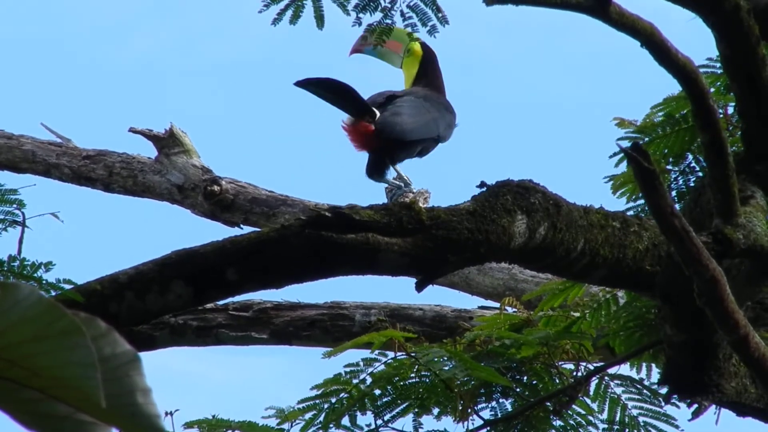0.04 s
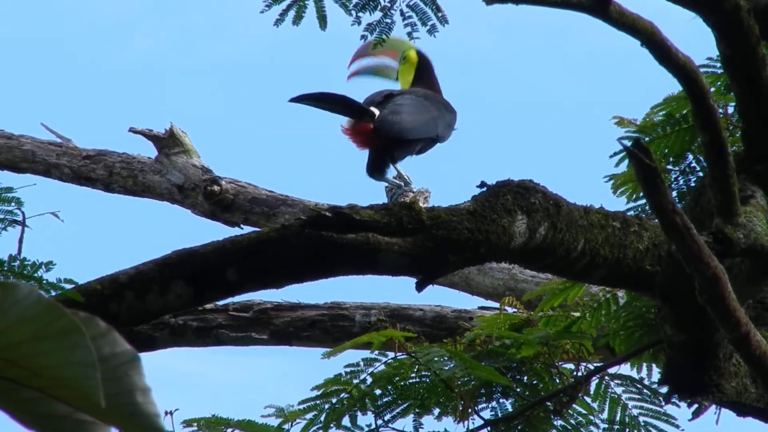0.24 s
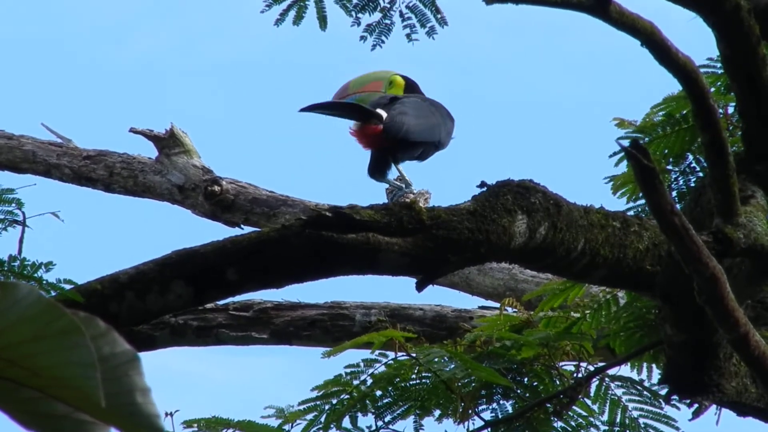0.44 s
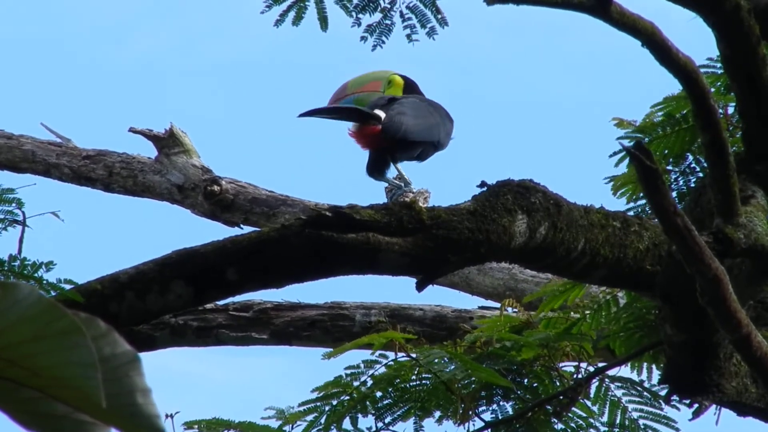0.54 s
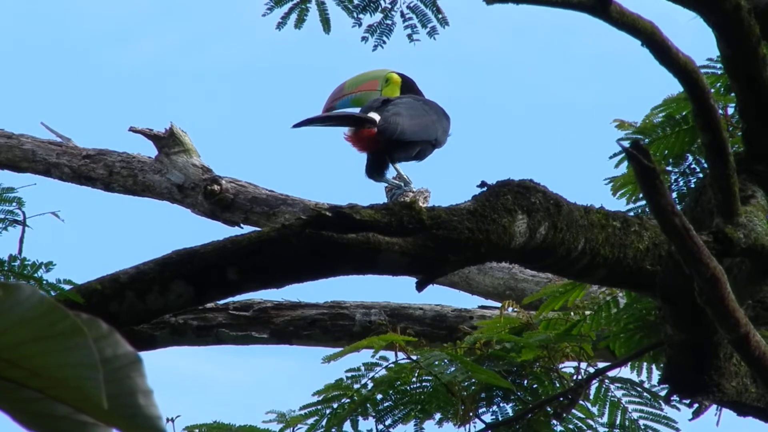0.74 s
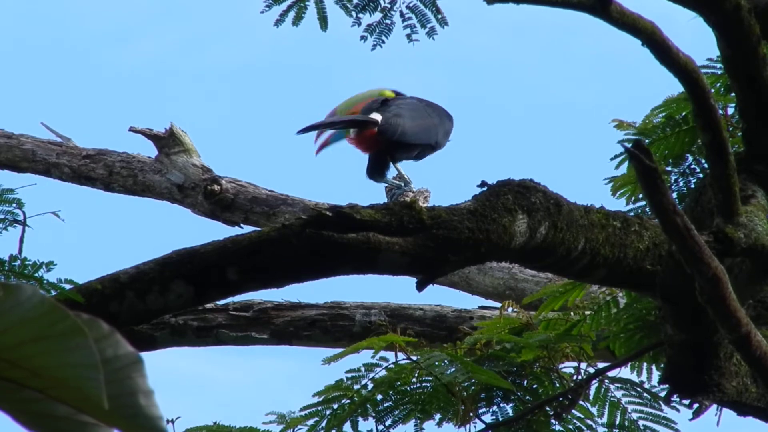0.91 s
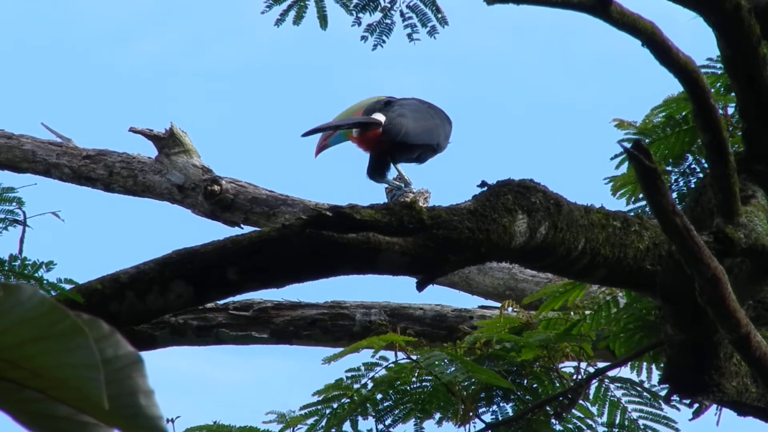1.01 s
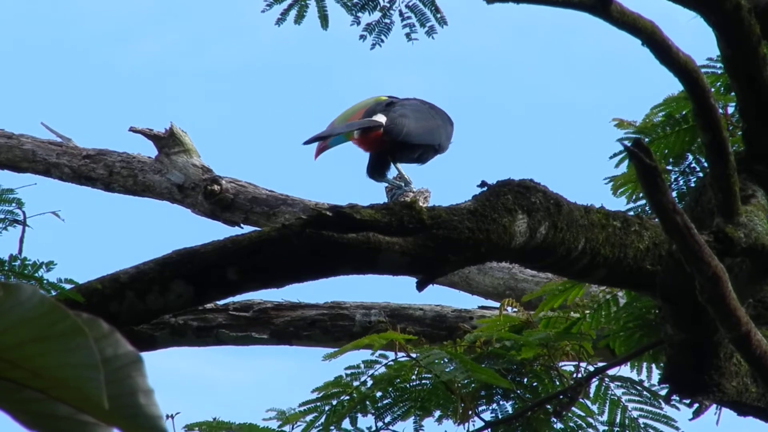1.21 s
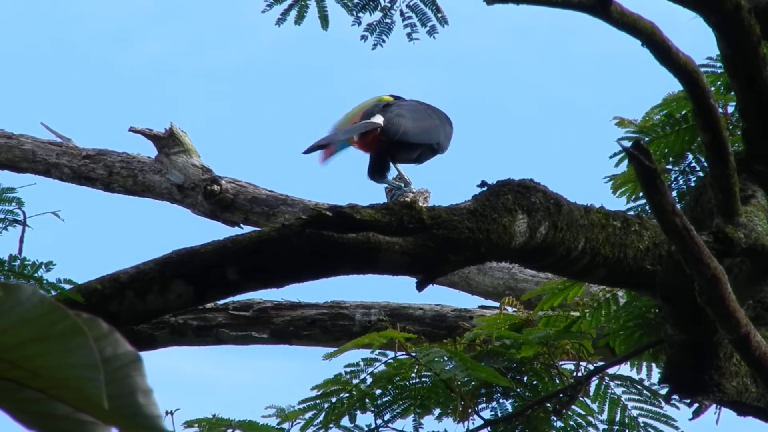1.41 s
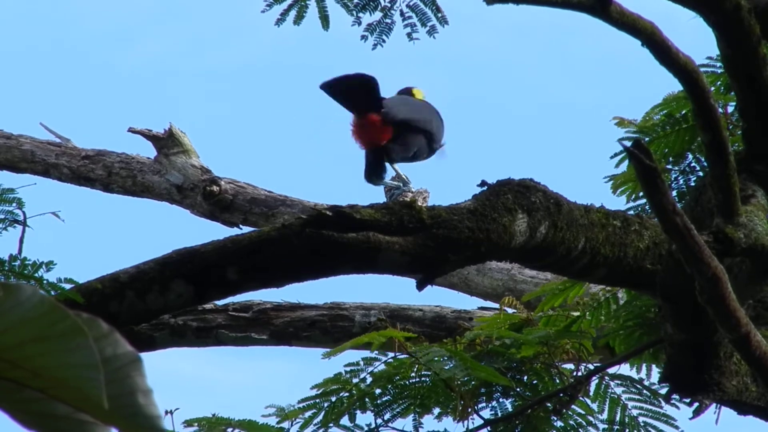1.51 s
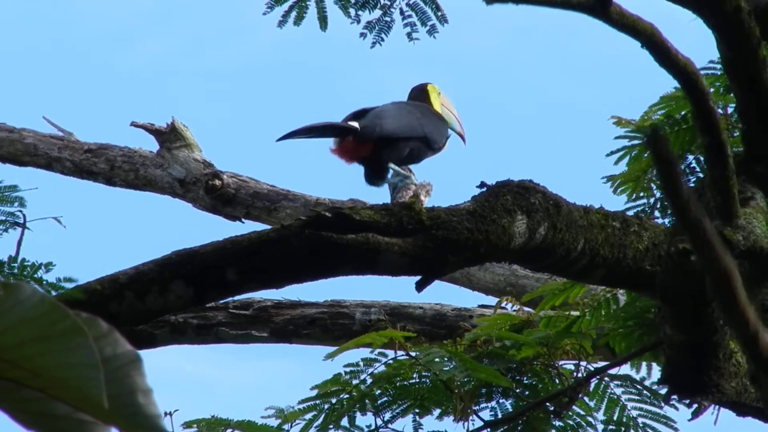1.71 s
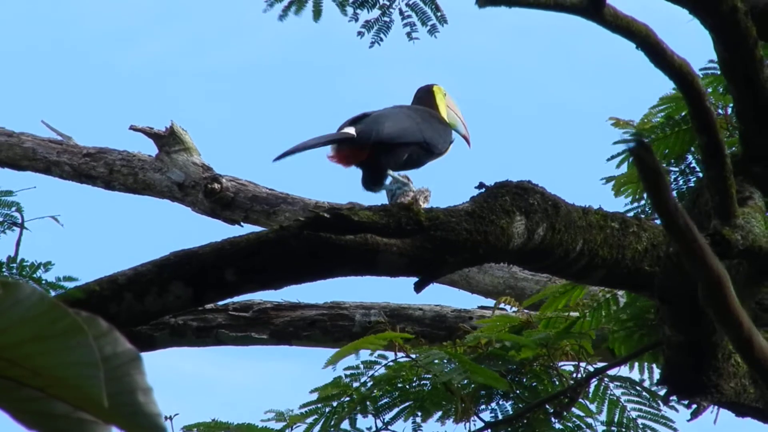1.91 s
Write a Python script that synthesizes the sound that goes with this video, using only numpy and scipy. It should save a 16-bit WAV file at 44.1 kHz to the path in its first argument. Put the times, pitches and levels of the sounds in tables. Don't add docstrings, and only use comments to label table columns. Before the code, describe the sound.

A toucan yelps loudly once, then twice more briefly and softly, with a second answering in three rattling croaks; small high chirps repeat over insects, leaves and light wind, heard outdoors in stereo from some distance.

```python
import sys
import numpy as np
from scipy import signal
from scipy.fft import rfft, irfft, next_fast_len
from scipy.io import wavfile
from scipy.ndimage import uniform_filter1d

SR = 44100
rng = np.random.default_rng(int(sys.argv[2]) if len(sys.argv) > 2 else 0)


def store_pcm(level_fs):
    pcm = np.round(np.clip(level_fs, -1, 1) * 32767).astype(np.int16)
    wavfile.write(sys.argv[1], SR, np.atleast_2d(pcm).T)


def voltage_ratio(decibels):
    exponent = np.asarray(decibels, float) / 20
    return 10 ** exponent


N = 85995

# (frequency [Hz], density [dB])
AIR_SPECTRUM = [(600, -6.5), (1000, 3), (2500, 1.5), (4000, 2), (7600, -11), (8700, -1.5), (11200, -11),
                (15900, -17)]
# (centre [Hz], width [Hz], level [dB])
INSECT_BANDS = [(9890, 820, -61), (6260, 2050, -57)]
# (frequency [Hz], density [dB])
WIND_SPECTRUM = [(20, -37), (45, -68), (75, 6), (110, 5), (200, 0), (300, -12), (600, -24)]
# (time [s], level [dB])
GUST_LEVEL = [(0.0, -68), (0.238, -66), (0.308, -55), (0.396, -60), (0.438, -55), (0.558, -66),
              (0.928, -66), (0.95, -61), (1.058, -58), (1.112, -67), (1.412, -63), (1.466, -70),
              (1.558, -60), (1.95, -67)]
# (time [s], level [dB])
DRONE_LEVEL = [(0.0, -59), (0.216, -55.5), (0.222, -57), (1.09, -58.5), (1.276, -52), (1.834, -53.5),
               (1.95, -58.5)]
# (frequency [Hz], density [dB])
DRONE_SPECTRUM = [(250, -6), (330, -3.5), (405, 6.5), (480, 1), (700, -3.5), (1000, -11.5)]
# (frequency [Hz], correlation [-1..1])
PORT_CORRELATION = [(60, .52), (300, .15), (700, .05), (2000, .5), (5000, .35), (9000, -.15), (14000, -.1)]
# (frequency [Hz], left minus right [dB])
PORT_BALANCE = [(60, 1.5), (500, -0.9), (2000, 2.5), (5000, 2), (10000, -3.5), (14000, 0)]
# (start [s], length [s], from [Hz], to [Hz], level [dB])
FAR_WHISTLES = [(0, .16, 2750, 2760, -51), (0, .12, 1695, 1680, -58), (0, .11, 1500, 1550, -58),
                (0, .13, 2160, 2110, -60), (1.435, .07, 1920, 1900, -57), (1.53, .07, 1850, 2000, -54),
                (1.655, .04, 3200, 3150, -52), (.295, .04, 1230, 1280, -46), (1.778, .06, 3200, 3390, -54),
                (1.84, .10, 3400, 3380, -53), (1.775, .08, 3770, 3770, -58), (.42, .09, 4580, 4500, -54),
                (1.71, .035, 2370, 2370, -58), (1.26, .1, 1800, 1780, -63)]
# (start [s], level [dB], end of high note [Hz], middle notes [Hz], low note [Hz])
CHIRP_PHRASES = [(.565, -61, 7300, 6900, 5600), (.724, -57, 7250, 6950, 5600),
                 (.878, -54, 7250, 7050, 5700), (1.030, -53, 7150, 7250, 5800),
                 (1.183, -52, 7200, 7400, 6300), (1.330, -52, 7250, 7300, 6600),
                 (1.483, -52, 7350, 7700, 6500), (1.636, -50, 7650, 8100, 6650),
                 (1.790, -50, 7800, 8000, 6650), (1.940, -51, 7800, 8000, 6650)]
# (delay [s], length [s], level [dB])
CHIRP_NOTES = [
    (0, .017, 4),
    (.052, .012, 2),
    (.070, .022, 3),
    (.088, .016, -1),
    (.123, .020, 1),
]
NOTE_SWELL_DB = [8, -6, -8, -6, 0]
# (delay [s], level [dB])
CHIRP_TRUNKS = [(.026, -7), (.047, -11)]
# (start [s], rattle [s], hold [s], level [dB])
CROAK_CALLS = [
    (.303, .122, .066, -38.5),
    (.904, .122, 0.056, -37),
    (1.507, .120, 0.069, -34),
]
LOW_VOICE_HZ = [1300, 1430, 1478]
HIGH_VOICE_HZ = [1500, 1575, 1583]
# (start [dB], late rattle [dB], hold [dB])
LOW_VOICE_DB = [
    [-2, -4, -4],
    [6, -5, -5],
    [3, -14, -15],
]
# (time [s], first partial [dB], second partial [dB])
YELP_LEVELS = [
    [(.216, -55, -52), (.223, -35, -33), (.235, -30, -29), (.250, -25, -26), (.268, -25, -29),
     (.290, -34, -35), (.310, -36, -36), (.346, -28, -35), (.368, -56, -48)],
    [(.506, -52, -52), (.512, -41, -36), (.526, -36, -33), (.531, -32, -28), (.535, -39, -34),
     (.545, -64, -52)],
    [(.819, -52, -50), (.825, -42, -37), (.835, -43, -34), (.849, -35.5, -37), (.860, -60, -50)],
]
# (time [s], pitch [Hz])
YELP_PITCH = [(.216, 1660), (.232, 1695), (.247, 1682), (.267, 1588), (.285, 1530), (.323, 1485),
              (.353, 1425), (.367, 1170), (.506, 1490), (.531, 1465), (.544, 1130), (.818, 1530),
              (.836, 1520), (.846, 1475), (.860, 1150)]
# (delay [s], level [dB])
YELP_TRUNKS = [(.028, -14), (.079, -17)]


def evened(x):
    return x / np.sqrt(np.mean(x ** 2) + 1e-20)


def read(points, hz):
    f, value = np.transpose(points)
    return np.interp(np.log(hz + 1), np.log(f + 1), value)


def add(mix, start_s, sound):
    part = mix[round(start_s * SR):][:len(sound)]
    part += sound[:len(part)]


def flutter(count, span_s):
    size = max(int(span_s * SR), 1)
    smooth = uniform_filter1d(rng.standard_normal(count), size)
    return evened(uniform_filter1d(smooth, size))


def phase(hz):
    return 2 * np.pi * np.cumsum(hz) / SR


def edges(t, length_s, edge_s):
    return np.sin(np.pi / 2 * np.clip(np.minimum(t, length_s - t) / edge_s, 0, 1)) ** 2


def closing(left_s, edge_s):
    return edges(left_s, 9, edge_s)


def hiss(shape, patchy_db, swell_db):
    frames, hz = N // 256 + 5, np.fft.rfftfreq(1024, 1 / SR)
    a, b, c, d, patches = rng.standard_normal((frames, 513, 5)).T
    patches = uniform_filter1d(patches, size=10, axis=0)
    patches = evened(uniform_filter1d(patches, size=10, axis=1))
    swell = evened(uniform_filter1d(rng.standard_normal(frames), size=8))
    same = np.clip(read(PORT_CORRELATION, hz), -1, 1)[:, None]
    lean_db = read(PORT_BALANCE, hz)[:, None] / 2
    left = a + 1j * b
    right = same * left + np.sqrt(1 - same ** 2) * (c + 1j * d)
    z = np.array([left * voltage_ratio(lean_db), right * voltage_ratio(-lean_db)])
    z = z * voltage_ratio(shape(hz)[:, None] + patchy_db * patches + swell_db * swell)
    return evened(signal.istft(z, nperseg=1024, noverlap=768)[1][:, :N])


def echoed(x, echoes):
    out = x.copy()
    for delay_s, db in echoes:
        add(out, delay_s, voltage_ratio(db) * x[:N - round(delay_s * SR)])
    return out


def placed(x, pan_db, wet_db, t60_s, gap_s, same, even_hz=0):
    at = np.arange(0, SR - 20, 20) + rng.integers(0, 20, (2, (SR - 1) // 20))
    taps = np.zeros((2, SR))
    np.put_along_axis(taps, at, rng.choice([-1., 1.], at.shape), 1)
    t = np.arange(SR) / SR
    early = 1 + 4.3 * np.exp(-t / 0.012)
    taps = taps * voltage_ratio(-60 * t / t60_s) * np.clip((t - gap_s) / 0.0012, 0, 1) * early
    taps = np.array([taps[0], same * taps[0] + np.sqrt(1 - min(same, 1) ** 2) * taps[1]])
    wet = signal.fftconvolve(x[None], taps / np.linalg.norm(taps[0]), axes=1)[:, :N]
    if even_hz:
        wet = np.diff(wet, prepend=0) / (2 * np.sin(np.pi * even_hz / SR))
    sway, sway_s = .4, .003
    wet = wet * (1 - sway / 2 + sway * flutter(N, sway_s))
    return (np.array([x, x]) + voltage_ratio(wet_db) * wet) * voltage_ratio(np.array([[pan_db], [-pan_db]]) / 2)


def drone():
    level_db = np.interp(np.arange(N) / SR, *np.transpose(DRONE_LEVEL))
    spectrum = [(150, -44)] + DRONE_SPECTRUM + [(2000, -101)]
    return voltage_ratio(level_db) * hiss(lambda hz: read(spectrum, hz), 0.93, 0.17)


def wind():
    level_db = 2.5 + np.interp(np.arange(N) / SR, *np.transpose(GUST_LEVEL))
    spectrum = WIND_SPECTRUM + [(1200, -62)]
    return voltage_ratio(level_db) * hiss(lambda hz: read(spectrum, hz), 0.93, 0.28)


def leaves():
    spectrum = [(300, -57)] + AIR_SPECTRUM
    return voltage_ratio(-53) * hiss(lambda hz: read(spectrum, hz), patchy_db=1.6, swell_db=0.11)


def insects():
    out = np.zeros((2, N))
    for centre_hz, width_hz, db in INSECT_BANDS:
        band = hiss(lambda hz: np.maximum(-12 * ((hz - centre_hz) / width_hz) ** 2, -80), 1.6, 1.0)
        out = out + voltage_ratio(db) * band
    return out


def far_birds():
    out = np.zeros(N)
    fade_db, edge_s = -7, .006
    for start_s, length_s, hz, end_hz, db in FAR_WHISTLES:
        t = np.arange(0, length_s, 1 / SR)
        a = phase(hz + (end_hz - hz) * t / length_s + 8 * flutter(len(t), 0.027))
        level = voltage_ratio(db + fade_db * t / length_s) * (1 + 0.38 * flutter(len(t), 0.0027))
        add(out, start_s, level * edges(t, length_s, edge_s) * np.cos(a))
    return out


def chirps():
    out = np.zeros(N)
    top_hz, middle_end_hz, low_end_hz, rough = 8400, 6100, 5200, .15
    for start_s, db, top_end_hz, middle_hz, low_hz in CHIRP_PHRASES:
        sweeps = [(top_hz, top_end_hz)] + [(middle_hz, middle_end_hz)] * 3 + [(low_hz, low_end_hz)]
        for (delay_s, length_s, note_db), (hz, end_hz), swell_db in zip(CHIRP_NOTES, sweeps, NOTE_SWELL_DB):
            t = np.arange(0, length_s, 1 / SR)
            a = phase(hz + (end_hz - hz) * (t / length_s) ** 0.803)
            swell = swell_db * (t / length_s - (swell_db > 0))
            level = voltage_ratio(db + note_db + swell) * (1 + rough * flutter(len(t), 0.0011))
            add(out, start_s + delay_s, level * edges(t, length_s, 0.00037) * np.cos(a))
    return out


def croaks():
    out = np.zeros(N)
    beat_s, beat_open, leak, hold_rise_s, close_s = .0207, .78, .18, .009, .016
    burst_rise_hz, burst_spread_db, swell_db = 90, 1.0, -13
    side_hz, side_db, octave_db = 400, -20, -22
    rattle_rough, hold_rough = .2, .07
    for (start_s, rattle_s, hold_s, db), low_db in zip(CROAK_CALLS, LOW_VOICE_DB):
        length_s = rattle_s + hold_s
        t = np.arange(0, length_s, 1 / SR)
        rattling = t < rattle_s
        knots_s = [0, rattle_s * .9, rattle_s * 1.055]
        beat = np.minimum(((t - rattle_s) % beat_s) / (beat_s * beat_open), 1)
        rise_hz = burst_rise_hz * (beat - .5) * rattling
        low, high = (phase(np.interp(t, knots_s, hz) + rise_hz + 10 * flutter(len(t), 0.0032))
                     for hz in (LOW_VOICE_HZ, HIGH_VOICE_HZ))
        tone = np.cos(high) + voltage_ratio(np.interp(t, knots_s, low_db)) * np.cos(low)
        side_level = voltage_ratio(side_db + np.interp(t, knots_s, [0, 0, -10]))
        tone = tone + side_level * np.cos(high + 2 * np.pi * side_hz * t)
        tone = tone + voltage_ratio(octave_db) * np.cos(2 * high) * (0.72 + 0.34 * flutter(len(t), 0.0038))
        held = np.minimum((t - rattle_s) / hold_rise_s, 1)
        gate = leak + np.where(rattling, np.sin(np.pi * beat), held)
        spread_db = burst_spread_db * flutter(len(t), 0.0094) * rattling
        swell = voltage_ratio(db + swell_db * np.clip(1 - t / rattle_s, 0, 1) + spread_db)
        rough = np.interp(t, knots_s, [rattle_rough, rattle_rough, hold_rough])
        grain = 1 + rough * flutter(len(t), 0.0016)
        envelope = edges(t, length_s, 0.012) * closing(length_s - t, close_s)
        add(out, start_s, np.sqrt(2) * tone * gate * swell * envelope * grain)
    return out


def yelps():
    out = np.zeros(N)
    third_db, fourth_db, half_db, strain_db = -13.5, -34, -28, -27
    bill_hz, bill_width_hz, bill_rough = 4150, 250, .4
    edge_s, close_s, rough = 0.0014, .005, 0.011
    break_db, break_lead_s, break_grain_s = -30, .009, .0008
    for rows in YELP_LEVELS:
        s, first_db, second_db = np.transpose(rows)
        t = np.arange(s[0], s[-1], 1 / SR)
        hz = np.interp(t, *np.transpose(YELP_PITCH))
        a = phase(hz)
        bill = voltage_ratio(third_db) / (1 + ((3 * hz - bill_hz) / bill_width_hz) ** 2)
        bill = bill * (1 + bill_rough * flutter(len(t), 0.0013))
        upper = np.cos(2 * a) + bill * np.cos(3 * a) + voltage_ratio(fourth_db) * np.cos(4 * a)
        half = voltage_ratio(half_db) * np.clip((t - s[0] - .04) / 0.021, 0, 1) * np.cos(3 * a / 2)
        strain = voltage_ratio(strain_db) * np.cos(3 * a) * (0.36 + flutter(len(t), 0.006))
        tone = voltage_ratio(np.interp(t, s, first_db)) * (np.cos(a) + half + strain)
        tone = tone + voltage_ratio(np.interp(t, s, second_db)) * upper
        crack = voltage_ratio(break_db) * np.exp(-((t - s[-1] + break_lead_s) / 0.0023) ** 2)
        grain = 1 + rough * flutter(len(t), 0.0016) + 10 * crack * flutter(len(t), break_grain_s)
        envelope = edges(t - s[0], s[-1] - s[0], edge_s) * closing(s[-1] - t, close_s)
        add(out, s[0], np.sqrt(2) * tone * grain * envelope)
    return out


def scene():
    bed = drone() + wind() + leaves() + insects()
    deep = placed(far_birds(), pan_db=1.5, wet_db=-7, t60_s=.5, gap_s=.01, same=.6)
    small = placed(echoed(chirps(), CHIRP_TRUNKS), pan_db=8, wet_db=0, t60_s=.3, gap_s=.004, same=.3)
    croak = placed(croaks(), pan_db=2.0, wet_db=-11, t60_s=1.2, gap_s=.02, same=.8)
    yelp = placed(echoed(yelps(), YELP_TRUNKS), pan_db=3.0, wet_db=-12, t60_s=.66, gap_s=.0327,
                  same=.93, even_hz=2340)
    return bed + deep + small + croak + yelp


def low_pass(x):
    return signal.sosfilt(signal.butter(12, 15960, fs=SR, output="sos"), x)


def record(dry):
    lag_s, low_cut_hz, edge_hz = 2.2e-5, 60, 15760
    size = next_fast_len(N + 4096)
    hz = np.arange(size // 2 + 1) * SR / size
    late = np.exp(-2j * np.pi * hz * lag_s * np.array([[1], [0]]))
    response = late * (hz < edge_hz) / np.sqrt(1 + (low_cut_hz / (hz + 1)) ** 8)
    mix = irfft(rfft(dry, size) * response, size)[:, :N]
    return low_pass(mix)


dry = scene()
out = record(dry)
store_pcm(out)
```